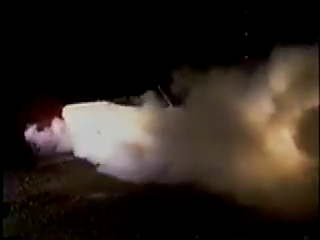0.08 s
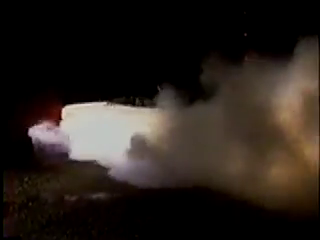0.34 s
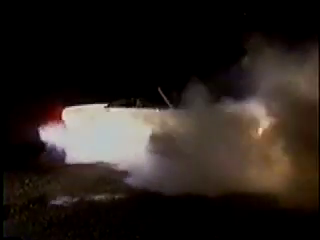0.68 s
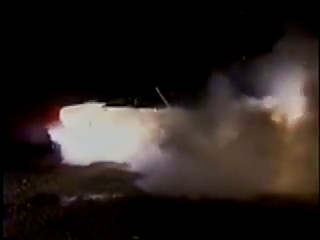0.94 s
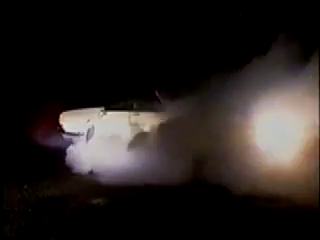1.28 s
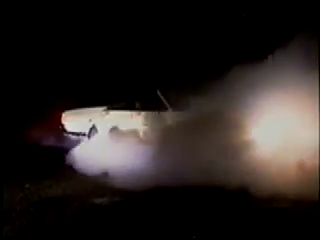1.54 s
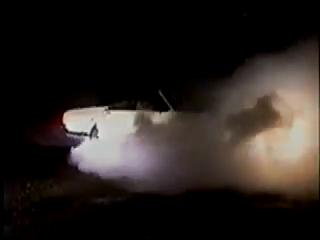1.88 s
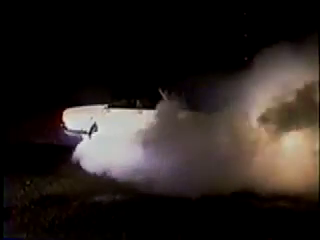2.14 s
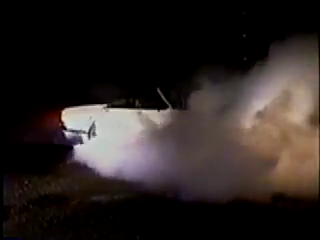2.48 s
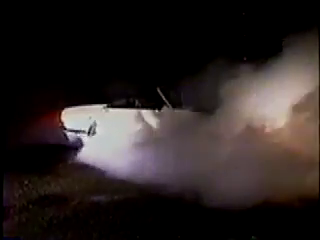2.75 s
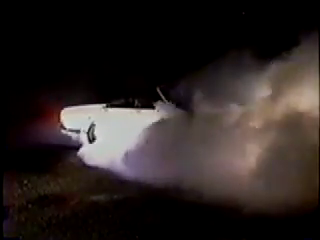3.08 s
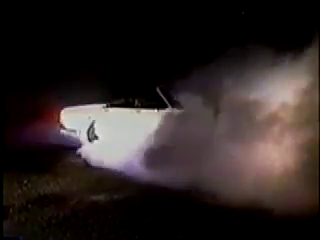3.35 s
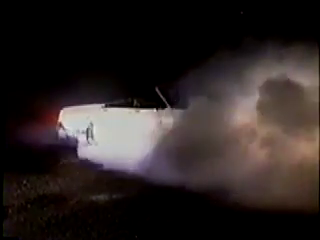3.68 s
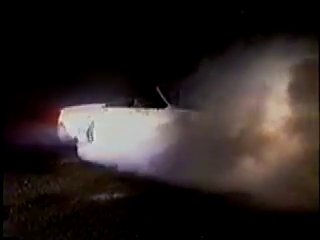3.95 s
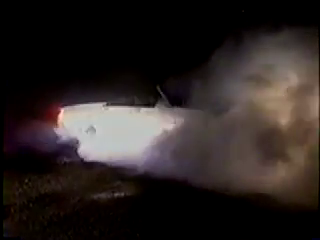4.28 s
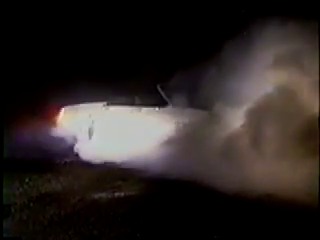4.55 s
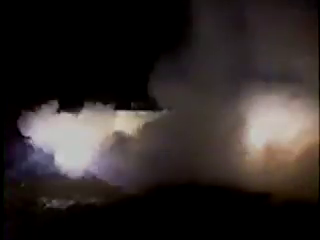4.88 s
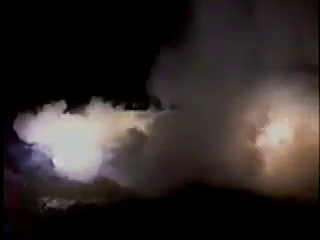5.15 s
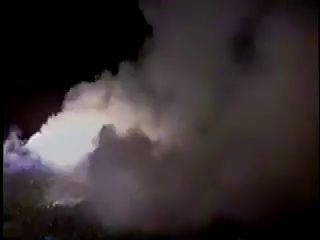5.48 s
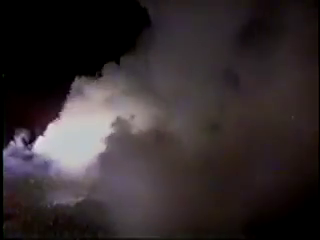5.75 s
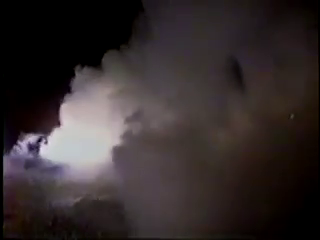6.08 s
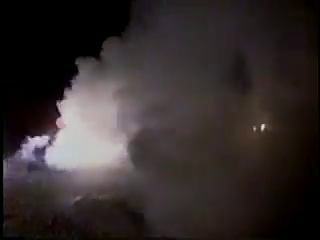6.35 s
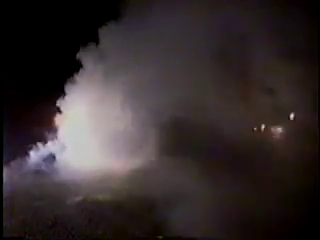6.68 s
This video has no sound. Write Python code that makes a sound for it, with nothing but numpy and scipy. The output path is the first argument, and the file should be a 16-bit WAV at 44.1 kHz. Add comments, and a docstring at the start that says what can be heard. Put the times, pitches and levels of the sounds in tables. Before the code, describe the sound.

A V8 engine holds high revs with a throbbing, raspy exhaust while spinning tyres scrub and screech, the sound briefly cutting out three times.

```python
"""A V8 burnout on pavement, a few metres from the mono microphone of a dull, slightly saturated tape camcorder.
From the start the engine is held near 3000 rpm: uneven exhaust pulses throb once a cycle, the pipes rasp,
and the spinning rear tyres scrub and screech while a low squeal swells, then slowly fades. At 1.2 s the
sound cuts out briefly. The revs sag under load, taking the pitch of tread and screech with them, and the
level dips three times. Two more cuts come near 5 and 5.5 s; at the end the revs pick up a little."""
import sys
import numpy as np
from scipy.fft import rfft, irfft, next_fast_len
from scipy.io import wavfile
from scipy.ndimage import map_coordinates

SR = 44100
rng = np.random.default_rng(int(sys.argv[2]) if len(sys.argv) > 2 else 0)


def inscribe(sig):
    """Save sig as 16-bit PCM at rate SR to the path in sys.argv[1].

    A 1-D sig is mono; a 2-D sig holds one channel per row.
    Samples are clipped to [-1, 1] before scaling.
    """
    pcm = np.round(np.clip(np.atleast_2d(sig).T, -1, 1) * 32767)
    wavfile.write(sys.argv[1], SR, pcm.astype(np.int16))


N = 300321
FULL_SPEED = 25  # engine cycles a second: 3000 rpm


def amp(db):
    """Decibels to gain."""
    return 10 ** (np.asarray(db) / 20)


def unit(x):
    """x at rms 1."""
    return x / np.sqrt(np.mean(x ** 2) + 1e-20)


def clock():
    """The time of each sample [s]."""
    return np.arange(N) / SR


def curve(rows):
    """(time, value) rows joined into one value per sample."""
    return np.interp(clock(), *np.transpose(rows))


def wobble(rate):
    """A smooth random curve, rate knots a second."""
    return map_coordinates(rng.standard_normal(int(N * rate / SR) + 4), [np.arange(N) * rate / SR])


def filtered(x, response):
    """x through a gain given as a function of frequency."""
    size = next_fast_len(N + SR // 2)
    return irfft(rfft(x, size) * response(np.fft.rfftfreq(size, 1 / SR)), size)[..., :N]


def coloured(x, points):
    """x through (frequency [Hz], gain [dB]) points joined on a log axis."""
    f, db = np.transpose(points)
    return filtered(x, lambda hz: amp(np.interp(np.log(hz + 1), np.log(f), db)))


def ringing(x, modes):
    """x through (centre [Hz], width [Hz], gain [dB]) resonances of alternating sign."""
    return filtered(x, lambda f: sum(
        (-1) ** k * amp(db) * 1j * f * width / (centre ** 2 - f ** 2 + 1j * f * width)
        for k, (centre, width, db) in enumerate(modes)))


# the tape's response: (frequency [Hz], gain [dB])
TAPE_RESPONSE = [(20, 1), (5400, 2), (6000, -5.5), (6500, -14), (7000, -21.5), (8000, -30.5), (11000, -37),
                 (15000, -49)]

def tape(x, ceiling, steepest, crackle):
    """Tape rounds peaks, loses treble and blunts the steepest swings, leaving a fine crackle."""
    saturated = x / (1 + (x / ceiling) ** 4) ** (1 / 4)
    dull = coloured(saturated, TAPE_RESPONSE)
    slope = np.diff(dull, prepend=0)
    excess = slope - np.clip(slope, -steepest, steepest)
    return dull - crackle * coloured(excess, [(9000, -0.5), (15000, -13.0)])


# faint ticks: (time [s], level [dB])
TICKS = [(2.485, -27.5), (2.502, -18), (2.519, -20.5), (4.897, -16.5)]

def camcorder_noise():
    """Tape hiss, line-scan whine and a few ticks lie far below the car."""
    whine = amp(-73) * np.sin(2 * np.pi * 15734 * clock())
    noise = whine + amp(-77) * rng.standard_normal((2, N))
    for time, db in TICKS:
        noise[:, int(time * SR)] += amp(db)
    return noise


# dips in level: (time [s], half width [s], gain [dB])
DIPS = [(2.235, .02, -4), (3.575, 0.026, -3.5), (4.201, 0.027, -10)]

def dips():
    """A gain that sinks briefly and recovers."""
    return amp(sum(db * np.exp(-((clock() - time) / width) ** 2) for time, width, db in DIPS))


# stretches with sound: (start [s], end [s], start of one engine cycle [s])
STRETCHES = [(0, 1.194, .0554), (1.4024, 4.965, 1.4454), (5.194, 5.534, 5.2596), (5.7414, 6.9, 5.7925)]

def cut_outs(tail_db, tail_t60):
    """A gain that is open in each stretch, then drops to a faint, dying tail."""
    t = clock()
    gain = np.zeros(N)
    for start, end, _ in STRETCHES:
        tail = amp(tail_db - 60 * np.maximum(t - end, 0) / tail_t60)
        gain += (t >= start) * np.where(t < end, 1, tail)
    return gain


def slipping(speed, modes, flutter_db):
    """Rubber sticks and slips at random and rings the tread; the pitch follows the wheel speed."""
    travel = np.cumsum(speed) / FULL_SPEED
    ring = ringing(rng.standard_normal(N), modes)
    return unit(map_coordinates(ring, [travel], mode="mirror") * amp(flutter_db * wobble(30)))


# the tyres' high resonances: (centre [Hz], width [Hz], gain [dB])
SCREECH_MODES = [(3594, 90, -4.5), (3820, 130, -1), (4710, 120, -4.5), (4920, 170, -12.5),
                 (5690, 150, -11.5)]
# the screech at the microphone: (time [s], level [dB])
SCREECH_LEVEL = [(1.15, -29.5), (1.45, -35.5), (3.7, -37.5), (4.4, -33), (4.9, -36), (5.3, -45.5),
                 (5.8, -43.5), (6.3, -36.5)]

def screech(speed):
    """The high note of slipping rubber comes and goes."""
    return amp(curve(SCREECH_LEVEL)) * slipping(speed, SCREECH_MODES, flutter_db=1.0)


# the tyres' low resonance: (centre [Hz], width [Hz], gain [dB])
SQUEAL_MODE = [(893, 55, 0)]

def squeal(attack_s, swell_db, fade_db_per_s):
    """A low squeal builds, its swing limited by friction, and fades as the rubber heats."""
    t = clock()
    level_db = -27 - fade_db_per_s * t - swell_db * np.maximum(1 - t / attack_s, 0)
    limited = np.tanh(unit(ringing(rng.standard_normal(N), SQUEAL_MODE)))
    return amp(level_db) * unit(ringing(limited, [(908, 390, 0)]))


# rubber scrubbing the pavement: (frequency [Hz], level [dB])
SCRUB_SPECTRUM = [(400, -24.5), (900, -1.5), (1500, 0.5), (2000, -5.5), (2450, -3.5), (3100, -1),
                  (4100, -4.5), (4600, -0.5), (5400, -2.5), (6000, -3.5), (9000, -4.5)]
# the tread's resonances: (centre [Hz], width [Hz], gain [dB])
TREAD_MODES = [(1335, 66, -2), (1609, 60, 3.5), (1860, 46, -2), (2368, 64, 2.5), (2888, 50, -15)]

def scrub(speed):
    """The grainy hiss of tearing rubber and the ringing tread grow with wheel speed."""
    level_db = -28 + 1.3 * (speed - FULL_SPEED)
    grain = amp(wobble(400) + 0.92 * wobble(35))
    hiss = amp(2.5) * unit(coloured(grain * rng.standard_normal(N), SCRUB_SPECTRUM))
    tread = amp(-4.5) * slipping(speed, TREAD_MODES, flutter_db=0.5)
    return amp(level_db) * (hiss + tread)


# turbulence at the tailpipes: (frequency [Hz], level [dB])
RUMBLE_SPECTRUM = [(20, -19), (38, -13), (65, -3), (120, -8.5), (230, 6.5), (380, -2.5), (600, -8.5),
                   (1500, -48)]

def rumble():
    """Turbulent gas leaves the pipes as a steady low noise."""
    return unit(coloured(rng.standard_normal(N), RUMBLE_SPECTRUM))


# gas puffs at the tailpipes: (frequency [Hz], level [dB])
RASP_SPECTRUM = [(300, -17.5), (480, -14.5), (620, -5), (720, -2.5), (850, -0.5), (1000, -9), (1090, -5.5),
                 (1220, -20), (1350, -6), (1650, -8.5), (1980, -18), (2300, -11.5), (2800, -23.5),
                 (6000, -23.5)]

def rasp(cycles, depth, repeat, size=1600):
    """A puff of gas at each of the eight firings; part of its ragged shape recurs every cycle."""
    puffs = 1 + depth * np.cos(2 * np.pi * 8 * cycles)
    recurring = map_coordinates(rng.standard_normal(size), [cycles % 1 * size], mode="grid-wrap")
    return unit(coloured(puffs * (rng.standard_normal(N) + repeat * recurring), RASP_SPECTRUM))


def harmonic_db(speed, fast_db, slow_db):
    """A harmonic's level changes as the revs slide it through the pipes' resonances."""
    return np.interp(speed, [24, 25], [slow_db, fast_db])


# high exhaust harmonics: (multiple of the cycle rate, level at 3000 rpm [dB], level at 2880 rpm [dB])
BARK_HARMONICS = [(15, -18, -16.5), (16, -30, -24), (17, -28.5, -20), (19, -20.5, -35.5), (23, -22, -24),
                  (24, -15, -24), (25, -12, -12.5), (26, -19, -14.5), (27, -15.5, -19.5), (28, -18, -14.5),
                  (29, -19.5, -21.5), (30, -21, -34), (32, -18, -23), (33, -13, -28.5), (34, -15.5, -21),
                  (35, -15, -25), (36, -24, -21), (37, -19, -25), (38, -25, -20), (39, -23.5, -17.5),
                  (40, -28, -20), (44, -19.5, -23), (45, -26, -18), (53, -20, -24)]

def bark(speed, cycles, flutter_db, smear_rad):
    """The exhaust's upper harmonics, shaken in size and timing."""
    sound = np.zeros(N)
    for order, *levels in BARK_HARMONICS:
        gain = amp(harmonic_db(speed, *levels) + flutter_db * wobble(12))
        sound += gain * np.cos(2 * np.pi * (order * cycles + rng.random()) + smear_rad * wobble(22))
    return unit(sound)


# low exhaust harmonics: (multiple of the cycle rate, level at 3000 rpm [dB], level at 2880 rpm [dB])
BOOM_HARMONICS = [(2, -29.5, -37.5), (3, -20, -22.5), (4, -14, -17), (5, -15, -11.5), (6, 0.5, 2),
                  (7, -5.5, -7), (8, -10.5, -14.5), (9, -1.5, -4), (10, -4, -4), (11, -15.5, -12),
                  (12, -24.5, -28), (13, -14.5, -15)]

def boom(speed, cycles, flutter_db, size=256):
    """Each cycle kicks the pipes into a decaying swing; its harmonics waver a little."""
    orders, fast_db, slow_db = np.transpose(BOOM_HARMONICS)
    mean_db = np.interp(np.arange(size // 2 + 1), orders, (fast_db + slow_db) / 2)
    cepstrum = irfft(np.log(amp(mean_db)))
    phase = 2 * rfft(cepstrum[:size // 2], size).imag  # minimum phase: the kick first, then the decay
    sound = np.zeros(N)
    for order, *levels in BOOM_HARMONICS:
        gain = amp(harmonic_db(speed, *levels) + flutter_db * wobble(22))
        sound += gain * np.cos(2 * np.pi * order * cycles + phase[int(order)])
    return -unit(sound)


def crank(speed):
    """Engine cycles counted from a cycle start in each stretch."""
    count = np.cumsum(speed) / SR
    cycles = count.copy()
    for start, _, beat in STRETCHES:
        cycles[int(start * SR):] = count[int(start * SR):] - count[int(beat * SR)]
    return cycles


def exhaust(speed):
    """Four layers leave the pipes together; the throttle is held, so they keep one strength."""
    cycles = crank(speed) + 0.0016 * wobble(14)
    pipes = amp(-1.4) * boom(speed, cycles, flutter_db=1.47)
    pipes += amp(-9.5) * bark(speed, cycles, flutter_db=1.9, smear_rad=0.25)
    pipes += amp(-8.5) * rasp(cycles, depth=0.4, repeat=0.73)
    pipes += amp(-13) * rumble()
    return amp(-18) * pipes


# the revs sag under load, then pick up a little: (time [s], engine speed [cycles/s])
ENGINE_SPEED = [(0, 25.16), (0.8, 25.17), (1.19, 24.74), (2.3, 24.95), (3.85, 24.35), (4.35, 24.35),
                (5.4, 23.69), (6.1, 23.95), (6.81, 24.09)]

def scene():
    """The car stays on one spot of pavement, a few metres from the microphone."""
    speed = curve(ENGINE_SPEED)
    car = exhaust(speed) + scrub(speed)
    car += squeal(attack_s=0.45, swell_db=5, fade_db_per_s=1.5) + screech(speed)
    return np.array([car, car])


def record(dry):
    """The camcorder's microphone feeds a dull, faintly noisy tape; the sound dips and cuts out."""
    sound = tape(dry, ceiling=0.68, steepest=0.061, crackle=0.55) * dips() + camcorder_noise()
    sound *= cut_outs(tail_db=-20.5, tail_t60=0.086)
    return filtered(sound, lambda hz: hz < 15830)


dry = scene()
out = record(dry)
inscribe(out)
```